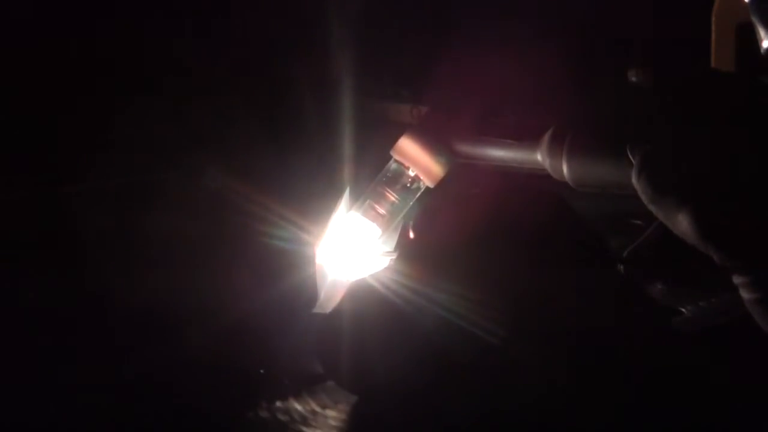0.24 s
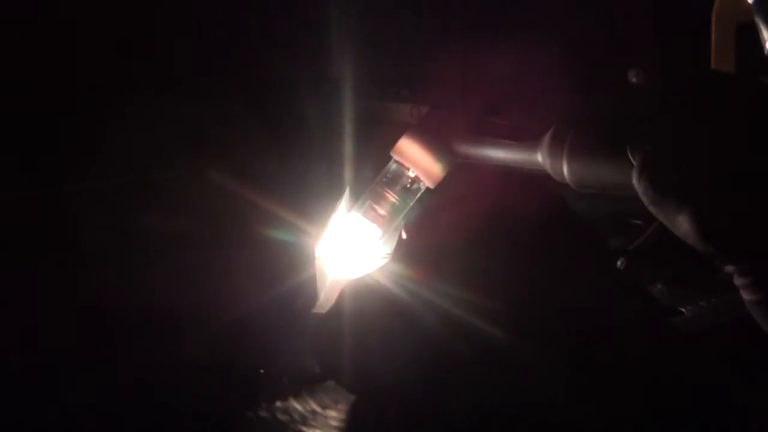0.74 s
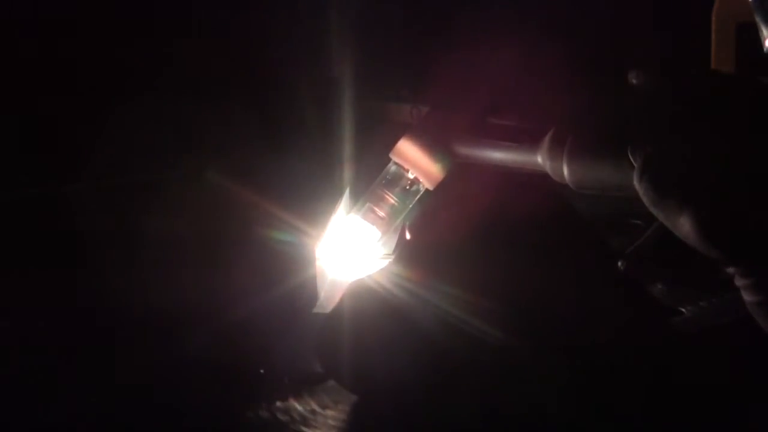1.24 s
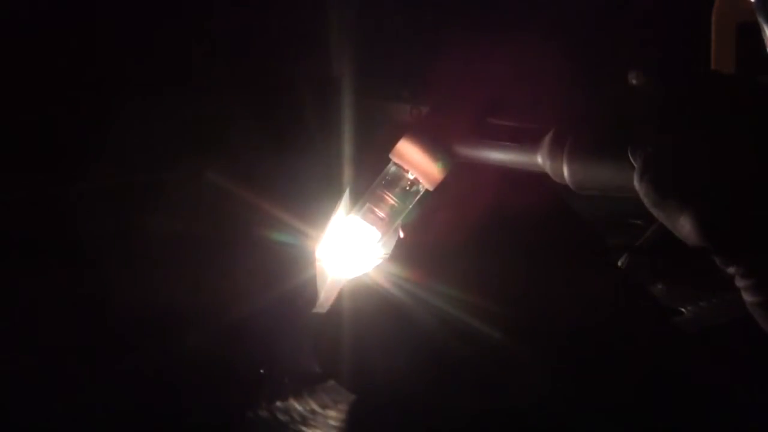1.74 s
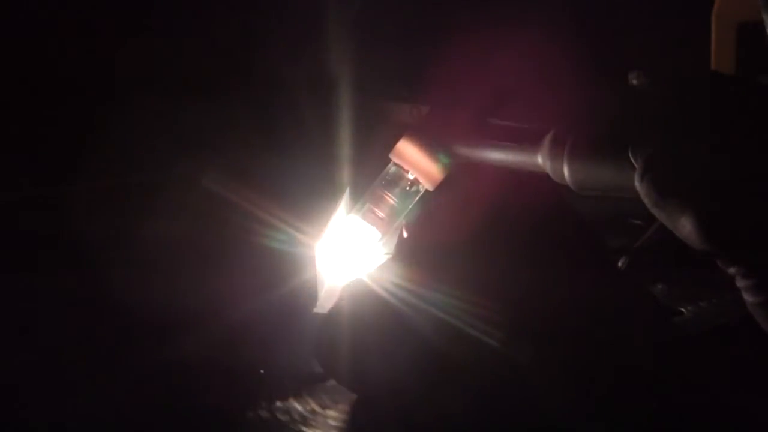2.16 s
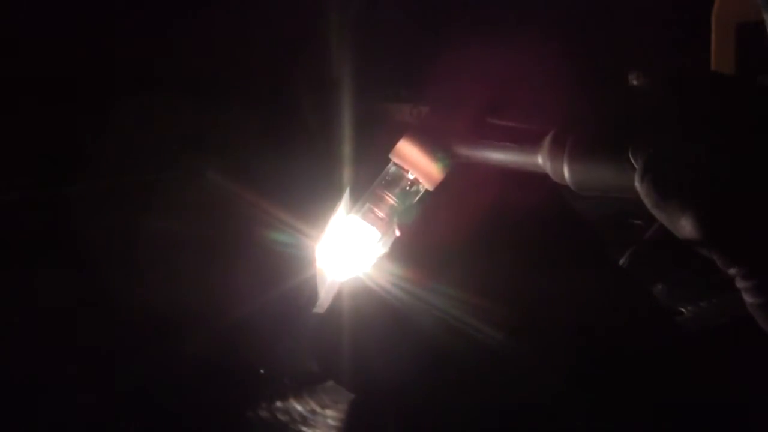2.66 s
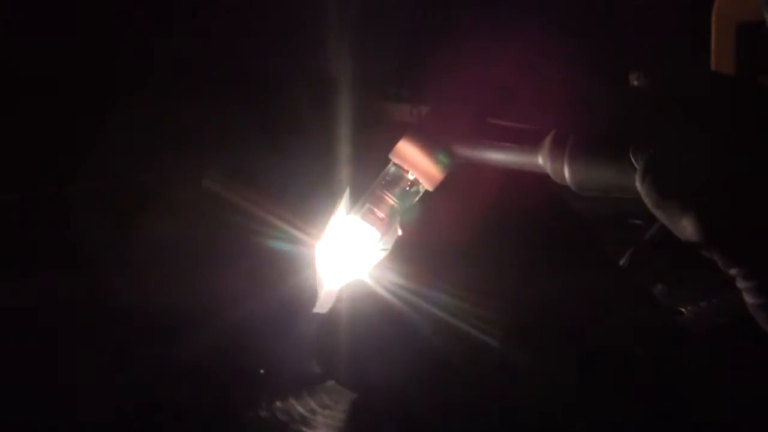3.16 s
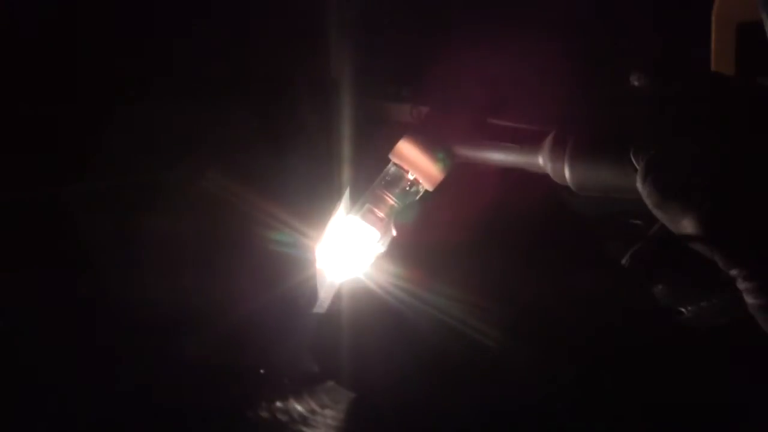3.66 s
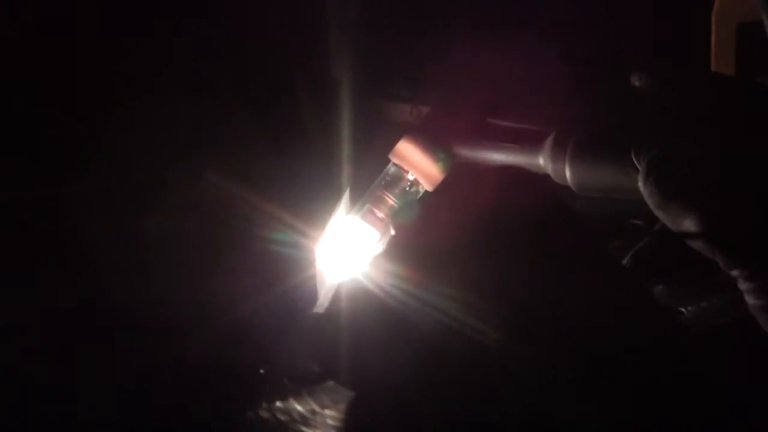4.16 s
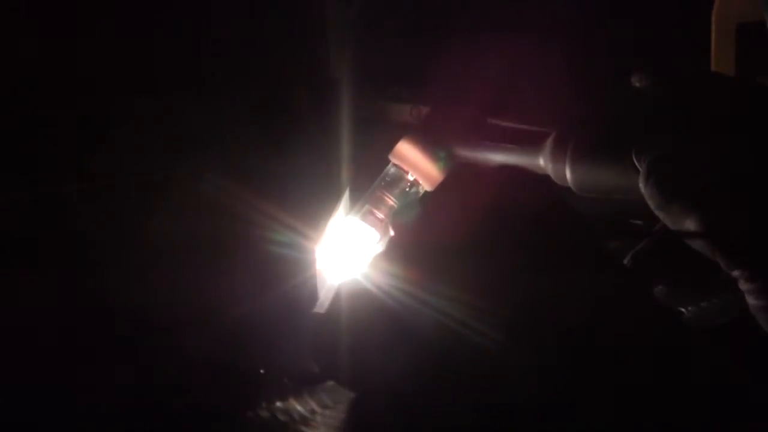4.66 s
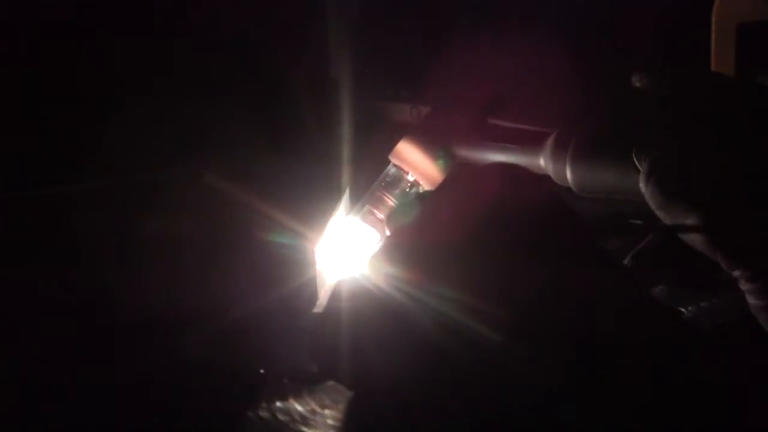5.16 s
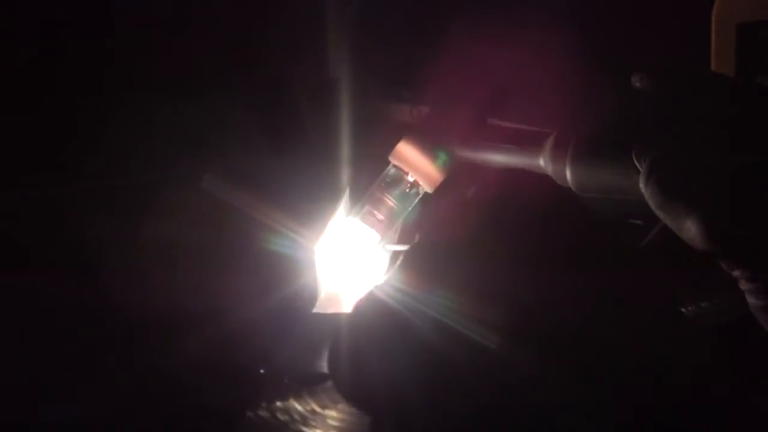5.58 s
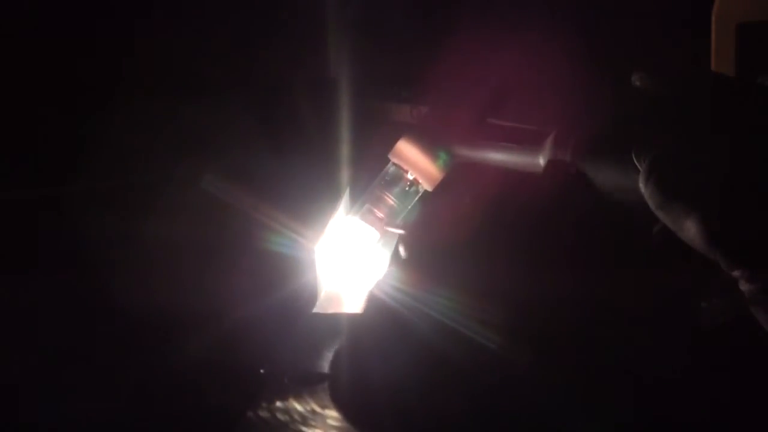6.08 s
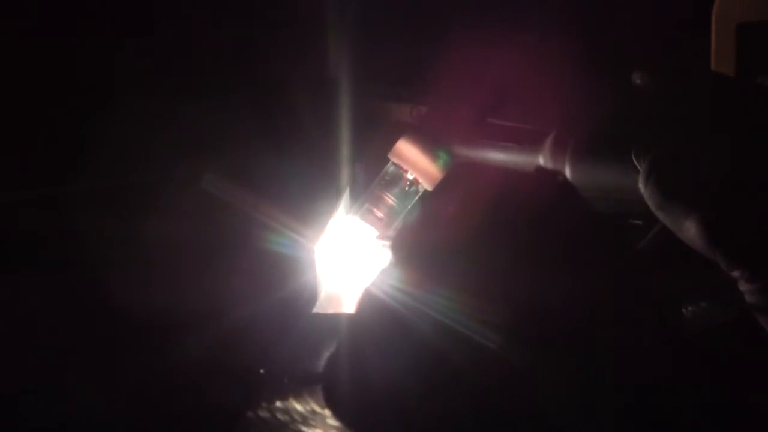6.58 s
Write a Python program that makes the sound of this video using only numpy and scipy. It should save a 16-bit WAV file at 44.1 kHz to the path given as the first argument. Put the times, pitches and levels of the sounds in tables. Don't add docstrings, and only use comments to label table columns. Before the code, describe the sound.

Continuous raspy buzz of an alternating-current welding arc close up, snapping rapidly, with flickering hiss swelling mid-way and a soft machine fan behind.

```python
import sys
import numpy as np
from scipy import signal
from scipy.fft import rfft, irfft, next_fast_len
from scipy.io import wavfile
from scipy.ndimage import uniform_filter1d

SR = 44100
rng = np.random.default_rng(int(sys.argv[2]) if len(sys.argv) > 2 else 0)


def volts_from_decibels(level):
    exponent = np.asarray(level, float) / 20
    return 10 ** exponent


def digitize_waveform(pressure):
    field = np.atleast_2d(pressure).T
    bounded = np.clip(field, -1, 1)
    quanta = np.round(bounded * 32767).astype(np.int16)
    wavfile.write(sys.argv[1], SR, quanta)


N = 300761
CYCLE_HZ, FIRST_S = 72.4765, .00592
SHIFT_S = 5.25, 5.75
GRID = 64


def peak_filter(hz, width_hz, lift_db):
    a, w, side = volts_from_decibels(lift_db / 2), 2 * np.pi * hz / SR, np.pi * width_hz / SR
    b = [1 + side * a, -2 * np.cos(w), 1 - side * a]
    return b, [1 + side / a, -2 * np.cos(w), 1 - side / a]


def coloured(x, resonances):
    for hz, width_hz, lift_db in resonances:
        x = signal.lfilter(*peak_filter(hz, width_hz, lift_db), x)
    return x


def rms_one(x):
    return x / np.sqrt(np.mean(x ** 2) + 1e-20)


def slow_chance(rate, count):
    settle = 9000
    r = np.exp(-2 * np.pi * rate)
    return rms_one(signal.lfilter([1], [1, -r], rng.standard_normal(count + settle))[settle:])


def bells(centre_s, half_s):
    return np.exp(-((np.arange(0, N, GRID) / SR - centre_s[:, None]) / half_s[:, None]) ** 2)


def swells_db(table):
    s, half_s, db = np.transpose(table)
    return db @ bells(s, half_s)


# t/s centre, half length/s, sizzle level/dB
OXIDE_PATCHES = [(.8, .16, -41), (1.056, 0.058, -24), (1.16, .06, -27), (1.29, .07, -21),
                 (1.52, 0.086, -25), (1.67, 0.072, -28), (1.79, 0.05, -25.5), (1.935, 0.056, -22.5),
                 (2.093, 0.081, -21.5), (2.225, 0.088, -21.5), (2.4, 0.13, -24), (2.646, 0.13, -22),
                 (2.836, 0.12, -28), (3.06, 0.13, -24), (3.237, 0.054, -19.5), (3.38, 0.086, -24),
                 (3.56, .07, -28), (3.753, 0.13, -24.5), (3.94, 0.035, -27), (4.2, 0.045, -34),
                 (4.38, .07, -31), (5.38, .05, -31), (5.58, 0.045, -34), (5.773, 0.13, -29.5),
                 (5.97, .04, -43), (6.122, 0.092, -35)]
# t/s centre, half length/s, level/dB
CLEAN_LULLS = [
    (1.37, .03, -1),
    (1.82, .02, -1),
    (2.943, .02, -5),
    (4.02, .015, -1),
    (5.95, .015, -1),
    (6.158, .02, 2),
    (6.447, 0.028, 0),
]
# t/s centre, half length/s, level/dB
LENGTH_SWELLS = [(0.31, 0.21, -0.9), (.9, 0.085, 0.7), (1.077, 0.026, 1.5), (1.406, 0.071, 0),
                 (1.85, 0.071, -1), (2.025, 0.068, 1), (2.626, 0.036, 0.5), (3.03, .05, 0.5),
                 (3.45, 0.087, -0.4), (4.3, .1, 0), (4.9, 0.41, -0.3), (5.697, .2, -0.1),
                 (6.135, 0.066, -1.5), (6.45, 0.071, -1), (6.78, 0.05, 2)]
# t/s centre, half length/s, level/dB
WEAK_SPELLS = [(.68, .2, -0.5), (1.6, 0.18, -2), (1.92, 0.056, -16), (3.25, 0.24, -2.5), (2.167, 0.091, -6),
               (3.01, 0.09, -4), (3.982, 0.069, -1), (5.133, 0.21, -5.5), (5.932, 0.036, -2.5),
               (6.247, 0.055, -4.5), (6.766, 0.069, -5)]
THIN_OXIDE_DB = -31.5


def arc_state():
    t, coarse = np.arange(N) / SR, np.arange(0, N, GRID) / SR
    moved = np.interp(coarse, SHIFT_S, [0, 1])
    s, half_s, db = np.transpose(OXIDE_PATCHES)
    sizzle_db = 10 * np.log10(volts_from_decibels(THIN_OXIDE_DB) ** 2 + volts_from_decibels(db) ** 2 @ bells(s, half_s))
    sizzle_db = sizzle_db + swells_db(CLEAN_LULLS)
    oxide_db = sizzle_db - THIN_OXIDE_DB
    steady_db = -0.5 + swells_db(LENGTH_SWELLS) + 0.016 * oxide_db
    uneven_db = 2.4 + 3 * moved + swells_db(WEAK_SPELLS)
    buzz_db = moved - 0.29 * oxide_db
    return [np.interp(t, coarse, db) for db in (steady_db, uneven_db, sizzle_db, buzz_db)]


# f/Hz, level/dB rms
BLADE_TONES = [
    (457, -52),
    (1044, -55),
    (188, -72),
]
# f/Hz, level/dB per Hz
AIR_RUSH = [(25, -9), (60, -8), (150, -9), (300, 0), (600, 4), (1000, -1), (1600, -3), (2300, 1),
            (7000, -1), (10000, -9), (13000, -20), (16000, -42)]
AIR_RUSH_DB = -40


def fan():
    hz = np.arange(1, N // 2 + 2) * SR / N
    rush_hz, rush_db = np.transpose(AIR_RUSH)
    colour_db = np.interp(np.log(hz), np.log(rush_hz), rush_db)
    out = volts_from_decibels(AIR_RUSH_DB) * rms_one(irfft(rfft(rng.standard_normal(N)) * volts_from_decibels(colour_db), N))
    for line_hz, level_db in BLADE_TONES:
        waver_s = np.cumsum(1 + 0.0018 * slow_chance(3 / SR, count=N)) / SR
        out += np.sqrt(2) * volts_from_decibels(level_db) * np.sin(2 * np.pi * line_hz * waver_s)
    return out


# multiple of the cycle, level/dB
BUZZ_MULTIPLES = [(1, -48), (2, -39), (3, -16), (4, -19.5), (5, -10.5), (6, -7.5), (7, -7.5), (8, -9.5),
                  (9, 1.5), (10, -5), (11, 4), (12, -10.5), (13, -3), (14, -20), (15, -13), (16, -14),
                  (17, -9), (18, -14), (19, -13), (20, -30), (21, -26), (22, -15.5)]
BUZZ_DB = -39
BUZZ_LAG_MS, PROMPT_FROM = .63, 14
FOLLOWS_FROM = 6


def buzz(level_db):
    turn, out = (np.arange(N) / SR - FIRST_S) * CYCLE_HZ, np.zeros(N)
    cycles = np.arange(500)
    for multiple, order_db in BUZZ_MULTIPLES:
        breath_db = np.interp(turn, cycles, 1.17 * slow_chance(1.0, count=500))
        if multiple % 2 == 0:
            breath_db = breath_db + np.interp(turn, cycles, 1.7 * slow_chance(.06, count=500))
        late = multiple < PROMPT_FROM
        lag = np.pi / 2 * (multiple % 2 - 1) + np.pi * late
        delayed = turn - late * BUZZ_LAG_MS * CYCLE_HZ / 1000
        gain = volts_from_decibels(order_db + breath_db + level_db * (multiple >= FOLLOWS_FROM))
        out += gain * np.cos(2 * np.pi * multiple * delayed - lag)
    return np.sqrt(2) * volts_from_decibels(BUZZ_DB) * out


PUFF_DB, PUFF_LOW_HZ, PUFF_TOP_HZ = -26.5, 384, 624


def puff(level_db):
    band = signal.butter(2, [PUFF_LOW_HZ, PUFF_TOP_HZ], "band", fs=SR, output="sos")
    return volts_from_decibels(level_db + PUFF_DB) * rms_one(signal.sosfilt(band, rng.standard_normal(N)))


# f/Hz, lift/dB
ROOT_COLOUR = [(1100, 1), (1900, -5), (2350, 5), (3400, -6), (5300, -4), (6300, 5.5), (8300, 5.5),
               (10000, 7), (13500, -1)]
# f/Hz, width/Hz, lift/dB
ROOT_SHAPE = [(2300, 1400, -4), (1050, 700, -5), (3700, 600, 2), (5700, 500, 2), (8700, 500, -3)]
SIZZLE_DB, LEAK_DB = -6.8, -15
SIZZLE_LOW_HZ = 1500
SIZZLE_ON_MS, SIZZLE_OFF_MS = 7.0, .7
START_DB, GROW_MS, FADE_MS = -1.5, 3.2, 0.69


def sizzle(level_db):
    turn = (np.arange(N) / SR - FIRST_S) * CYCLE_HZ
    ms = turn % 1 * 1000 / CYCLE_HZ
    gate = np.clip((ms - SIZZLE_ON_MS) / .3, 0, 1)
    gate = gate * volts_from_decibels(START_DB * np.clip(1 - (ms - SIZZLE_ON_MS) / GROW_MS, 0, 1))
    gate = gate + np.exp(-np.maximum(ms - SIZZLE_OFF_MS / 2, 0) / FADE_MS * 2) + volts_from_decibels(LEAK_DB)
    cycle = np.floor(turn + .5).astype(int)
    flutter_db = 1.3 * slow_chance(.4, count=int(turn[-1]) + 2)[cycle]
    noise = signal.lfilter(*signal.butter(1, SIZZLE_LOW_HZ, "high", fs=SR), rng.standard_normal(N))
    noise = coloured(noise, [(hz, hz / 4, lift_db) for hz, lift_db in ROOT_COLOUR])
    return coloured(noise, ROOT_SHAPE) * gate * volts_from_decibels(level_db + flutter_db + SIZZLE_DB)


def clicks(at_s, size):
    out, taps = np.zeros(N + 999), np.arange(-8, 9)
    at = at_s[:, None] * SR
    place = np.round(at).astype(int) + taps
    window = np.cos((place - at) * np.pi / 18) ** 2
    np.add.at(out, place, size[:, None] * np.sinc(place - at) * window)
    return out[:N]


SNAP_DB = 0.5


def reversal(steps, level_db, odd_cycles, usual_db=0):
    starts, out = FIRST_S + np.arange(int(N / SR * CYCLE_HZ)) / CYCLE_HZ, np.zeros(N)
    cycle_db = np.full(len(starts), float(usual_db))
    for s, db in odd_cycles:
        cycle_db[int((s - FIRST_S) * CYCLE_HZ + .25)] = db
    for ms, size, rise_us, wobble_db, jitter_us in steps:
        at = starts + ms / 1000 + jitter_us / 1e6 * rng.standard_normal(len(starts))
        chance = slow_chance(.3, count=len(starts))
        wobble = wobble_db * np.minimum(chance, np.tanh(chance))
        arc_db = level_db[np.minimum(at * SR, N - 1).astype(int)]
        gain = volts_from_decibels(arc_db + wobble * (cycle_db <= 0) + cycle_db)
        r = np.exp(-1e6 / (rise_us * SR))
        push_pull = [(1 - r) ** 2, -(1 - r) ** 2]
        out += signal.lfilter(push_pull, [1, -2 * r, r * r], clicks(at, size * gain) + 1e-18)
    return volts_from_decibels(SNAP_DB) * out


# t/ms in cycle, signed size, rise/us, wobble/dB, jitter/us
STEADY_STEPS = [
    (-.03, 2.4, 45, .8, 4),
    (.17, -1.3, 45, 1.0, 5),
    (.29, .35, 25, 1.2, 5),
    (.52, 1.3, 8, 1.2, 4),
    (.59, -1.05, 12, .8, 4),
    (.69, -.28, 14, 1.5, 5),
]
# t/s, level/dB
STEADY_FALTERS = [(0.765, -2.1), (0.972, -4.4), (1.096, -2.5), (1.124, -2.6), (1.151, -3.1), (1.206, -2.4),
                  (1.758, -3.7), (1.841, -2.1), (2.158, -1.7), (2.2, -3.0), (2.283, -4.5), (2.586, -2.1),
                  (2.752, -2.0), (2.917, -3.0), (2.931, -3.1), (2.945, -1.9), (3.4, -2.0), (4.021, -2.4),
                  (4.049, -2.3), (5.594, -1.8), (6.132, -2.4), (6.16, -3.7), (6.436, -1.9), (6.449, -3.2),
                  (6.463, -2.7)]
# f/Hz, width/Hz, lift/dB
STEADY_THIN = [(1350, 263, -0.5), (2640, 800, -0.5), (3665, 294, -9), (14700, 2500, -26), (12700, 740, 5),
               (7800, 300, -13), (10300, 350, 0), (13700, 540, -13)]
# f/Hz, width/Hz, lift/dB
STEADY_CUP = [(3200, 300, 4), (3650, 250, -4), (7050, 400, 3), (11500, 900, 2), (12300, 250, 3),
              (12650, 250, -3), (13700, 1100, 7)]


def steady_side(level_db):
    return coloured(reversal(STEADY_STEPS, level_db, STEADY_FALTERS), STEADY_THIN + STEADY_CUP)


# t/ms in cycle, signed size, rise/us, wobble/dB, jitter/us
STRIKE_STEPS = [
    (6.9, -.75, 11, 3.5, 4),
    (6.99, -.1, 18, 2.5, 8),
]
SETTLING_STEPS = [
    (7.115, -.8, 28, 2.5, 16),
]
REBOUND_STEPS = [
    (7.035, -1.6, 26, 1, 12),
    (7.15, 1.3, 24, 1, 14),
]
# t/s, level/dB
REBOUND_CYCLES = [(1.02, -4.0), (1.089, -4), (1.117, 2.5), (1.172, 2), (1.31, -5.5), (1.337, -3.5),
                  (1.406, -7.0), (1.751, -6.5), (2.221, 3.0), (2.276, 1.5), (2.359, -8.5), (2.4, -3.5),
                  (2.414, -2.5), (2.469, -2.0), (2.51, -4.5), (2.538, -2.0), (2.552, 1.0), (2.648, 1.5),
                  (2.662, -3.0), (2.717, 0.5), (2.814, -3.5), (2.883, -4.5), (2.897, -5.0), (2.91, -5.0),
                  (3.269, 3.0), (3.338, -11.0), (3.393, -3.5), (3.407, -0.5), (3.462, -3.5), (3.476, -2.5),
                  (3.504, -4.0), (3.642, -5.5), (3.835, -2.5), (3.849, -2.0), (3.862, -5.0), (3.945, -8.5),
                  (3.973, -1.5), (4.042, -9.5), (4.125, -7.5), (4.166, -8.0), (4.235, -9.0), (4.249, -11.5),
                  (4.4, -2), (4.414, 0.0), (5.353, -5.5), (5.422, -10.5), (5.491, -10.0), (5.573, 0.0),
                  (5.67, 0.5), (5.684, -1.5), (5.711, -1.5), (5.725, 0.5), (5.753, -3.5), (5.794, -3.0),
                  (5.822, -5.5), (5.904, -4.0), (6.111, -8.0), (6.153, -1.5), (6.429, 0.5), (6.443, -2.0)]
# t/s, level/dB
MISFIRE_CYCLES = [(0.041, -10), (0.054, -14), (0.73, -9), (0.744, -13), (0.786, -14), (0.799, -14),
                  (0.951, -14), (0.993, -12), (1.42, -12), (1.572, -14), (1.627, -10), (1.655, -14),
                  (1.682, -10), (1.738, -9), (1.889, -14), (1.903, -11), (1.917, -14), (1.931, -10),
                  (1.958, -13), (2.069, -9), (2.152, -14), (2.179, -14), (2.193, -14), (2.317, -11),
                  (2.331, -11), (2.441, -10), (2.938, -14), (2.952, -10), (2.966, -14), (3.007, -10),
                  (3.021, -14), (3.062, -9), (3.09, -14), (3.104, -14), (3.904, -9), (3.959, -12),
                  (4.028, -13), (4.042, -11), (4.056, -14), (4.138, -12), (4.276, -14), (4.428, -12),
                  (4.635, -10), (5.09, -9), (5.132, -14), (5.146, -9), (5.256, -14), (5.394, -14),
                  (5.518, -14), (5.767, -14), (5.835, -14), (5.932, -14), (5.987, -14), (6.208, -14),
                  (6.36, -10), (6.401, -13), (6.456, -13), (6.746, -14), (6.788, -14), (6.801, -14)]
# f/Hz, width/Hz, lift/dB
STRIKE_TONE = [(3250, 2700, -3), (4470, 1100, -5), (1420, 290, 4)]
SETTLING_RING = [(3350, 1100, -1), (4620, 970, -18.5), (2170, 730, 2)]
UNEVEN_TONE = [(2400, 250, -9.5), (2290, 90, 13.5), (13900, 930, -2), (12500, 900, -1.5)]
REBOUND_TONE = [(3140, 3800, -6), (1190, 860, 8.5), (4600, 1400, -1.5), (2080, 620, -3.5)]
STRIKE_LIFT_DB, SETTLING_LOSS_DB = 1, -20
SETTLING_DB, REBOUND_DB = 4.5, 1


def uneven_side(strike_db, settle_db):
    lifted = [(s, STRIKE_LIFT_DB) for s, _ in REBOUND_CYCLES]
    lost = [(s, SETTLING_LOSS_DB) for s, _ in REBOUND_CYCLES]
    strike = reversal(STRIKE_STEPS, strike_db, lifted + list(MISFIRE_CYCLES))
    settle = reversal(SETTLING_STEPS, settle_db + SETTLING_DB, lost)
    rebound = reversal(REBOUND_STEPS, settle_db + REBOUND_DB, REBOUND_CYCLES, usual_db=-99)
    usual = coloured(strike, STRIKE_TONE) + coloured(settle, SETTLING_RING)
    return coloured(usual, UNEVEN_TONE) + coloured(rebound, REBOUND_TONE)


# f/Hz, width/Hz, lift/dB
BODY_RESONANCES = [(750, 1326, 12.5), (960, 160, -4), (1554, 119, -15), (1798, 816, 12.5),
                   (2017.5, 7.2, -36), (2145, 55, -5), (3216, 506, 15.5), (3920, 140, -6.5),
                   (4623, 1850, 12.5), (5940, 146, -6), (6780, 260, 3), (10200, 116, -10),
                   (12450, 1660, 14.5), (15900, 5640, -10)]
# f/Hz, width/Hz, lift/dB
PATH_DIP = [(4035, 310, -4)]
LOW_CUT_HZ, TOP_HZ = 663, 9800


def body(x):
    x = coloured(x, BODY_RESONANCES + PATH_DIP)
    x = signal.sosfilt(signal.butter(2, LOW_CUT_HZ, "high", fs=SR, output="sos"), x)
    return signal.sosfilt(signal.butter(2, TOP_HZ, fs=SR, output="sos"), x)


# t/s, f/Hz, lift/dB
GLOVE_TRACKS = [
    [(0, 10700, -1), (.95, 10600, -10), (1.1, 10700, -12), (3.4, 10540, -2), (5.3, 11100, 3),
     (5.7, 10300, -16), (5.9, 10300, -3)],
    [(0, 9700, 2), (3.8, 9800, -6), (4.05, 10000, -8.5), (4.4, 9800, -8), (5.1, 10000, -8),
     (5.35, 9800, -11), (5.6, 9740, -7)],
]
GLOVE_WIDTH_HZ = 300


def travelling_notch(x, track):
    out, state, block = np.zeros(N), np.zeros(2), 512
    s, hz, db = np.transpose(track)
    for i in range(0, N, block):
        b, a = peak_filter(np.interp(i / SR, s, hz), GLOVE_WIDTH_HZ, np.interp(i / SR, s, db))
        out[i:i + block], state = signal.lfilter(b, a, x[i:i + block], zi=state)
    return out


# delay/ms, signed share before, signed share after the hand shifts
EARLY_ECHOES = [(.45, -.2, -.15), (.64, -.09, -.1), (.95, -.1, -.1), (1.22, -.12, -.11), (1.53, -.13, -.15),
                (1.67, -.1, -.17), (1.79, -.12, -.25), (1.92, -.1, -.25), (2.42, -.1, -.1),
                (2.93, .04, .07)]
# f/Hz, width/Hz, lift/dB
BEFORE_SHADE = [(1564, 120, -8.5), (12020, 510, -24), (7880, 49, -6), (11020, 200, -8.5), (13200, 430, -10),
                (3120, 390, -1), (14200, 1500, 7)]
RIM_SHADE = [(9480, 220, -7), (1900, 350, -1.5), (12000, 250, 4), (12650, 300, -3), (13150, 300, 4),
             (14250, 500, -4), (15300, 600, 4), (9200, 200, -3), (6300, 200, -4), (7550, 200, 2)]
AFTER_SHADE = [(1920, 330, 0), (2270, 500, -4.5), (3260, 4800, -2), (4800, 1700, 0.5), (5830, 150, -10),
               (7460, 88, -3), (7940, 290, -1), (11100, 4900, 3.5), (11800, 340, -2), (12240, 490, -18),
               (13250, 300, -1), (15000, 910, -9)]
GLOVE_SHADE = [(1200, 250, 4), (7550, 200, 3), (14300, 500, -4), (12630, 200, -6), (6050, 200, -3),
               (8250, 150, -5), (12280, 300, 10), (12750, 400, -8), (6650, 150, 4), (6250, 200, -4),
               (9200, 200, -3), (11500, 600, -2)]
TAIL_COLOUR = [(4930, 2500, -4), (8550, 4800, 5.5), (12300, 1500, -16)]
SHOP_DB, SHOP_T60_S, TAIL_ONSET_S = -15, 0.05, 0.0077


def surroundings(x):
    size = next_fast_len(N + SR)
    hz, spectrum = np.arange(size // 2 + 1) * SR / size, rfft(x, size)
    echoes = np.array(EARLY_ECHOES)
    late = np.exp(-2j * np.pi * hz * echoes[:, :1] / 1000)
    before, after = irfft(spectrum * (1 + echoes[:, 1:].T @ late), size)[:, :N]
    before = coloured(before, BEFORE_SHADE + RIM_SHADE)
    after = coloured(after, AFTER_SHADE + GLOVE_SHADE)
    moved = np.interp(np.arange(N) / SR, SHIFT_S, [0, 1])
    t = np.arange(SR // 2) / SR
    tail = rng.standard_normal(len(t)) * volts_from_decibels(-60 * t / SHOP_T60_S) * np.clip(t / TAIL_ONSET_S - 1, 0, 1)
    tail = irfft(spectrum * rfft(tail / np.linalg.norm(tail), size), size)[:N]
    return before + moved * (after - before) + volts_from_decibels(SHOP_DB) * coloured(tail, TAIL_COLOUR)


# f/Hz, width/Hz, lift/dB
UNEVEN_CUP = [(3130, 350, -3), (3600, 300, 1), (4200, 350, 3), (6900, 350, -2), (14000, 1000, -3)]


def scene():
    steady_db, uneven_db, sizzle_db, buzz_db = arc_state()
    steady = steady_side(steady_db)
    uneven = coloured(uneven_side(uneven_db, steady_db) + sizzle(sizzle_db), UNEVEN_CUP)
    arc = body(steady + uneven)
    for track in GLOVE_TRACKS:
        arc = travelling_notch(arc, track)
    return (surroundings(arc) + buzz(buzz_db) + puff(sizzle_db) + fan())[None]


# t/s centre, half length/s, level/dB
TOP_LOSSES = [
    (.5, 0.039, -37),
    (1.52, .03, -5),
    (1.9, .05, -6),
    (2.75, .04, -5),
    (2.98, .05, -8),
    (3.09, .02, -7),
    (4.05, .04, -6),
    (4.9, .3, -1),
    (6.3, .3, 6),
]
TOP_BAND_HZ, FLICKER_DB, HOLD_S = 13300, 7, .014


def starved_top(x):
    spell = (np.arange(N) / SR / HOLD_S).astype(int)
    flicker_db = FLICKER_DB * np.minimum(rng.standard_normal(spell[-1] + 1), .5)[spell]
    level_db = np.repeat(swells_db(TOP_LOSSES), GRID)[:N] + flicker_db
    hz = np.arange(N // 2 + 1) * SR / N
    top = irfft(rfft(x) * np.clip((hz - TOP_BAND_HZ) / 1000, 0, 1), N)
    return x + (uniform_filter1d(volts_from_decibels(level_db), size=200) - 1) * top


def top_cut(x):
    return signal.sosfilt(signal.butter(12, 15760, fs=SR, output="sos"), x)


EDGE_HZ = 14600


def record(dry):
    cut = signal.sosfilt(signal.butter(8, EDGE_HZ, fs=SR, output="sos"), dry)
    mix = starved_top(cut)
    return top_cut(mix)


dry = scene()
out = record(dry)
digitize_waveform(out)
```